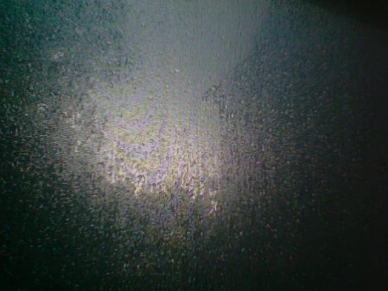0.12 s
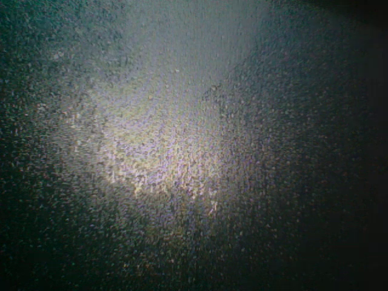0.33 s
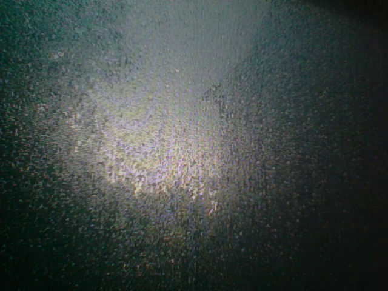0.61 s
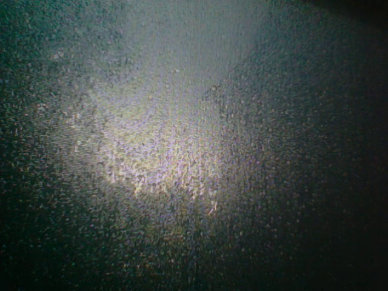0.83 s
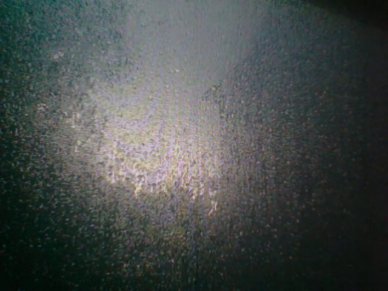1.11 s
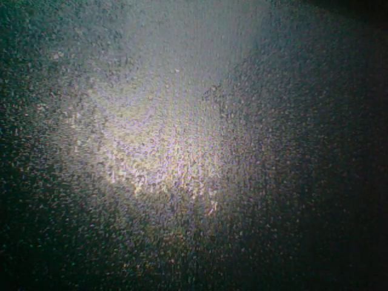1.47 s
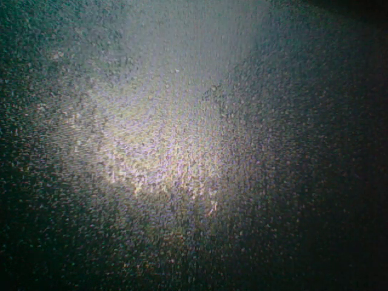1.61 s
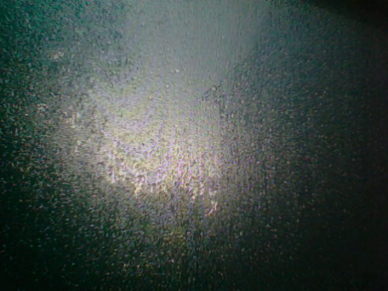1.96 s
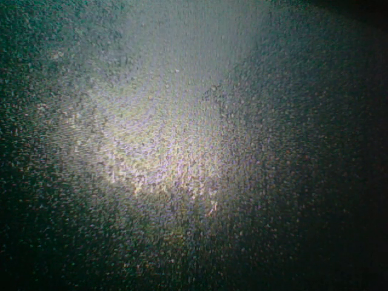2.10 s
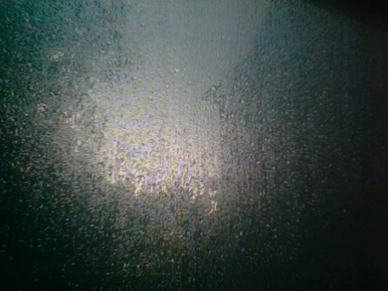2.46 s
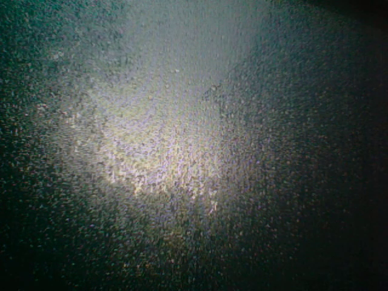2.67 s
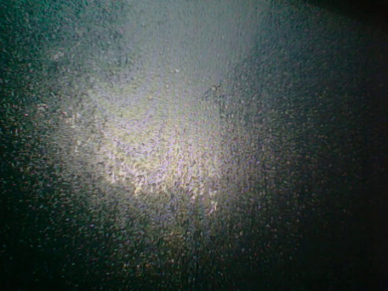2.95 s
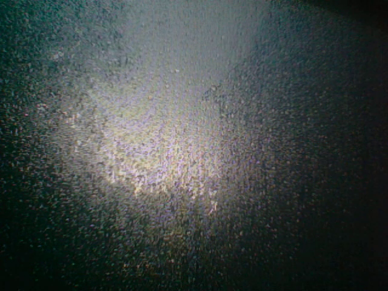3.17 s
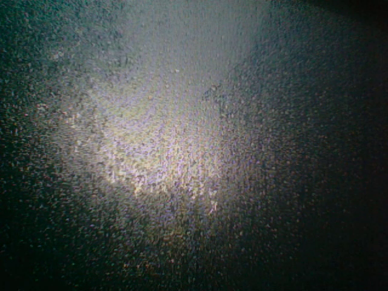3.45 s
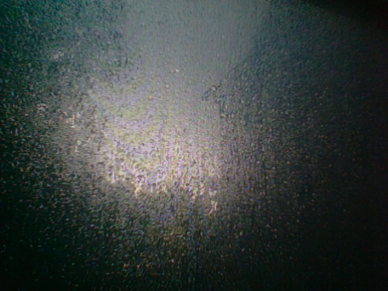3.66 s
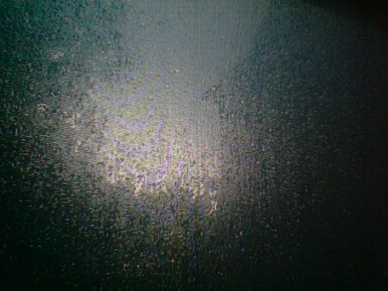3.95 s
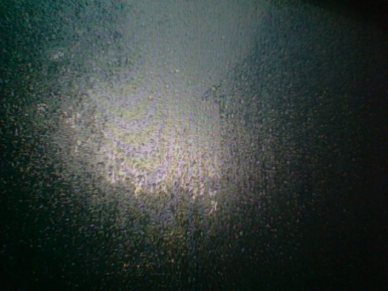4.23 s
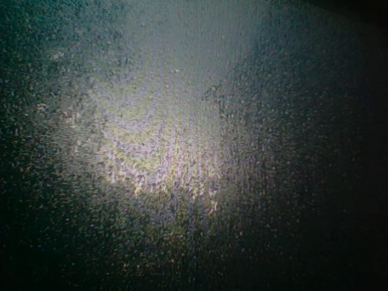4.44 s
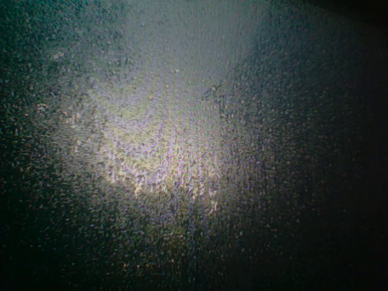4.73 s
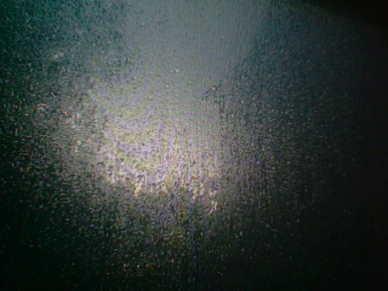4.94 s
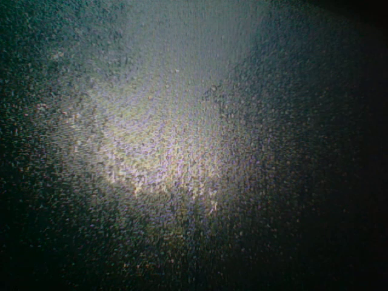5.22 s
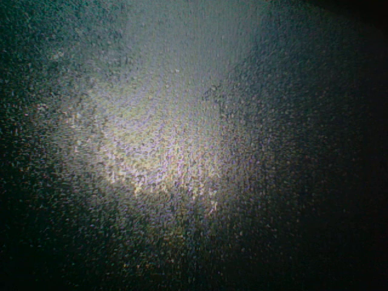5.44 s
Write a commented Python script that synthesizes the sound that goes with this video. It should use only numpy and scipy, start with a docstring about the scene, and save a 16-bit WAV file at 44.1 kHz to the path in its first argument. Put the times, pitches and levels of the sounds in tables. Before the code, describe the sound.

From inside a room at night, a small mono microphone picks up low rain wash and bright individual drops on glass. Something rubs nearby before the first second is over. Distant rumble grows to boxy, clattering thunder in two main waves, the second longer and crackling, all coloured by the ringing pane and room. A quiet motor hum and pulsing fine whine lie underneath.

```python
"""Thunder over night rain

Thunder rolls over steady rain, heard through a window by a small camera. Shock fronts from all along
the lightning channel are random clicks and bursts that ring through the pane and room. Rain is shaped noise,
drops tick on the glass as short rings, and something scuffs nearby as clicks in a hollow body. The camera's
motor hums in sine tones as it slowly speeds up, and its electronics whine in bursts of tones and hiss."""
import sys
import numpy as np
from scipy import signal
from scipy.io import wavfile
from scipy.ndimage import uniform_filter1d

SR = 44100
rng = np.random.default_rng(int(sys.argv[2]) if len(sys.argv) > 2 else 0)


def persist_wave(psi):
    """Save psi, clipped to +-1, as 16-bit WAV."""
    counts = np.round(np.clip(psi, -1, 1) * 32767).astype(np.int16)
    wavfile.write(sys.argv[1], SR, np.atleast_2d(counts).T)


N = 245637  # length in samples

# Tone colour of the rain, used for the wash and the small drops: (pitch_hz, relative_level_db)
RAIN_COLOUR = [(40, -39.5), (70, -35), (92, -16), (110, -9.5), (190, -1), (400, -6.5), (700, -12.5),
               (1300, -13.5), (1700, -17), (2200, -24.5), (2900, -23.5), (5200, -33), (6200, -37),
               (9500, -40), (12500, -46), (15500, -54)]


def amp(db):
    """Turn decibels into an amplitude factor."""
    return 10 ** (np.asarray(db) / 20)


def evened(x):
    """Scale a signal to an average (RMS) strength of 1."""
    return x / np.sqrt(np.mean(x ** 2) + 1e-20)


def read(points, hz):
    """Read a spectrum between its points, on a log-frequency axis."""
    point_hz, value = np.transpose(points)
    return np.interp(np.log(hz + 1), np.log(point_hz + 1), value)


def curve(s, value):
    """Join timed points into a control value for every sample."""
    return np.interp(np.arange(N) / SR, s, value)


def resonate(x, hz, width):
    """Ring at one fixed pitch with gain 1; a narrower width in Hz rings longer."""
    r = np.exp(-np.pi * width / SR)
    feedback = r * np.exp(2j * np.pi * hz / SR)
    return 2 * signal.lfilter([1 - r], [1, -feedback], x + 0j).real


def causal(points, size=16384):
    """Turn a spectrum into a minimum-phase response, whose energy comes as early as it can."""
    hz = abs(np.fft.fftfreq(size, 1 / SR))
    log_gain = np.log(amp(read(points, hz)))
    response = np.fft.ifft(np.exp(np.conj(signal.hilbert(log_gain)))).real
    return response[:size // 2]


def clicks(per_s, spread_db):
    """Random clicks of either sign; a few are much larger."""
    size = amp(spread_db * np.minimum(rng.exponential(1, N), 5))
    sign = rng.choice([-1., 1.], N)
    return size * sign * (rng.random(N) < per_s / SR)


def thunder():
    """All fronts pass the window; distance and direction shift the balance of its parts."""
    # The roll under the strong fronts: (start_s, level_db, bass_against_level_db, treble_against_level_db)
    roll_course = [(0, -73, 0, 10), (.3, -40.5, -7.5, -8), (.65, -45, -9, -11), (.95, -48.5, -5, -13),
                   (1.25, -37.5, -11, -2.5), (1.66, -38.5, -6, 1), (1.7, -31, -12, -6),
                   (1.76, -28.5, -6.5, 2.5), (2.05, -23, -7, -1), (2.402, -29.5, -7, 2),
                   (2.47, -17.5, 2.5, 0.5), (2.66, -23, -9.5, -0.5), (2.951, -25.5, -6, 0.5),
                   (3.15, -29.5, -12, -0.5), (3.42, -31.5, -11.5, 1), (3.499, -25, -7, -1),
                   (3.74, -23.5, -4, -4.5), (3.861, -18.5, -7.5, -5), (4.12, -18, -16.5, -6),
                   (4.34, -25.5, -13, -2.5), (4.65, -21, -12.5, -4), (4.9, -28.5, -8, 1),
                   (5.15, -28.5, -9, -1), (5.42, -36, -13, 1.5), (5.57, -29.5, -20, -7.5)]
    s, *columns = np.transpose(roll_course)
    level_db, bass_db, treble_db = (curve(s, db) for db in columns)

    # the two upper parts follow the treble; growl and crackle do so by their own shares
    upper = amp(-9.5 + treble_db)
    growl = amp(-16.5 + 1.36 * treble_db)
    # these two gain level (dB per second) as the roll moves across the sky
    moved_s = (np.arange(N) - N / 2) / SR
    middle = amp(-10.5 + 1.4 * moved_s)
    crackle = amp(-26 + 0.46 * treble_db + 1.3 * moved_s)

    dense = roll(clump_db=1.0) * amp(level_db)
    body, edge = claps()
    scattered = roll(clump_db=1.05) * amp(level_db)  # short waves come by many more paths
    # sharp fronts set the pane ringing
    rattle = amp(-6.5) * edge + amp(7.5) * resonate(edge, 1460, 74)

    # what drives each part of the window, from deep to bright
    drives = (dense * amp(bass_db) + amp(-12) * body,
              dense + amp(16.5) * body,
              -middle * (dense + amp(18.5) * body),
              upper * (scattered + amp(12.5) * body),
              growl * scattered + amp(0.5) * edge,
              crackle * scattered + rattle)
    return signal.oaconvolve(np.array(drives), window(), axes=1)[:, :N].sum(0)


def roll(clump_db):
    """Dense fronts arrive in clumps as bends of the channel come into earshot."""
    clumps = uniform_filter1d(uniform_filter1d(rng.standard_normal(N), 500), 500)
    fronts = clicks(per_s=900, spread_db=0.79)
    return evened(fronts * amp(clump_db * evened(clumps)))


def claps():
    """Each strong front brings its own quickly dying swarm of reflections; rows: body, bright edge."""
    # Strong fronts before the window's balance: (start_s, level_db, bright_edge_against_level_db, rise_s)
    strong_fronts = [(1.881, -12, -29, 0.0024), (1.919, -13, -22, 0.0026), (2.049, -12.5, -21, 0.0032),
                     (2.281, -15.5, -22, 0.0033), (2.469, -6, -19, 0.0044), (2.552, 0.5, -17, 0.0055),
                     (2.624, -13, -27, 0.012), (2.749, -8.5, -25, 0.0033), (2.777, -12.5, -15, 0.0029),
                     (2.907, -23, -10, .003), (2.959, -10, -35, 0.0035), (3.456, -8, -24, 0.0071),
                     (3.483, -2, -7.5, 0.0051), (3.596, -9, -33, .004), (3.671, -6.5, -29, 0.0036),
                     (3.757, -11, -18, .004), (3.828, -2, -25, 0.0054), (3.896, -12, -29, 0.0016),
                     (3.974, -13, -31, .004), (4.06, -2.5, -35.5, 0.0028), (4.118, -0.5, -29, 0.0031),
                     (4.237, -7.5, -30, 0.0014), (4.277, -9, -24, 0.0049), (4.378, -8, -6, 0.0062),
                     (4.49, -1, -11.5, 0.0044), (4.561, -20, -28, 0.0026), (4.648, -0.5, -8, 0.0026),
                     (4.717, -6.5, -9, 0.0022), (4.804, -16.5, -23, .003), (4.824, -3.5, -6.5, 0.00066),
                     (4.877, -13.5, -11, 0.0014), (5.017, -3, -10, 0.0035), (5.09, -15, -30, 0.0097),
                     (5.137, -12, -17, .004), (5.162, -13, -26, 0.0028), (5.474, -11.5, -30, 0.017)]
    length = 6000  # samples
    decay_s, edge_decay_s = 0.12, 0.073  # time to fall 60 dB; the edge has both fades
    push_db, push_limit_s = 1, .004  # push against the swarm; a slower rise loses its first push
    out, t = np.zeros((2, N + length)), np.arange(length) / SR
    for s, level_db, bright_db, rise in strong_fronts:
        swarm = rng.standard_normal(length) * (rng.random(length) < .1)
        swarm *= amp(-60 * t / decay_s) * (1 - np.exp(-t / rise))
        swarm /= np.linalg.norm(swarm)
        swarm[0] = -amp(push_db) * np.exp(-(rise / push_limit_s) ** 2)
        # the steepest part comes just after the first push
        edge = np.roll(swarm * amp(bright_db - 60 * t / edge_decay_s), 150)
        out[:, round(s * SR):][:, :length] += amp(level_db) * np.array([swarm, edge])
    return out[:, :N]


def window():
    """How pane and room ring after one front: six parts from deep to bright, each of energy 1."""
    # Tone colour of thunder through window and room: (pitch_hz, relative_level_db)
    pane_colour = [(15, -73), (25, -17.5), (59, -20.5), (92, -15.5), (189, 1.5), (294, -14.5), (336, -15),
                   (369, -11), (473, -12), (511, -16.5), (584, -12.5), (763, -32.5), (1430, -33),
                   (1800, -44.5), (2400, -56.5), (3120, -83), (5280, -120)]
    # Room resonances added to it: (pitch_hz, width_hz, level_db)
    room_resonances = [(89.5, 8, 3), (128, 3.4, -15), (141.7, 10, 1), (189.4, 14, -3), (242, 99, 7),
                       (329.7, 7.8, 2.5)]
    x = causal(pane_colour)
    x = x + sum(amp(db) * resonate(x, hz, width) for hz, width, db in room_resonances)
    bands_hz = ((20, 130), (130, 280), (280, 420), (420, 750), (750, 1150), (1150, 2600))
    filters = [signal.butter(3, band, "band", fs=SR, output="sos") for band in bands_hz]
    parts = np.array([signal.sosfilt(sos, x) for sos in filters])
    parts *= np.hanning(2 * len(x))[len(x):]  # smooth fade to silence
    return parts / np.linalg.norm(parts, axis=1)[:, None]


def rain():
    """Wash of far drops: random short-time spectra with drifting patches and shared flicker."""
    rain_db = -47
    frames, hz = N // 128 + 5, np.fft.rfftfreq(512, 1 / SR)
    a, b, patches = rng.standard_normal((frames, 257, 3)).T
    # smooth the patches over pitch, then over time
    patches = evened(uniform_filter1d(uniform_filter1d(patches, 8, 0), 16, 1))
    flicker = evened(uniform_filter1d(rng.standard_normal(frames), 6))
    gain_db = read(RAIN_COLOUR, hz)[:, None] + 0.66 * patches + 0.19 * flicker
    spectra = (a + 1j * b) * amp(gain_db)
    wash = signal.istft(spectra, nperseg=512, noverlap=384)[1][:N]
    return amp(rain_db) * evened(wash)


def drops():
    """Loud drops tick on the glass at set moments, over a random patter of small ones."""
    # The loudest drops, all lowered by 1 dB below: (start_s, level_db, pitch_hz)
    loud_drops = [(0.6459, -51, 3910), (1, -44, 4030), (1.0091, -55, 8250), (1.074, -49, 9700),
                  (1.5404, -54, 3850), (1.6008, -56, 9000), (1.9799, -49, 3700), (2.164, -46, 3920),
                  (2.2204, -50, 4150), (2.5222, -48.5, 4070), (2.9068, -56, 9560), (2.9522, -61, 10000),
                  (3.014, -48, 3990), (3.3094, -60, 9630), (3.3802, -48, 3750), (3.4401, -53, 4160),
                  (3.5019, -60, 9660), (3.881, -47, 3620), (4.1121, -52.5, 8480), (4.1619, -50, 3860),
                  (4.238, -47, 3890), (4.401, -46, 4230), (4.554, -57, 3930), (4.655, -56, 9910),
                  (4.7523, -46, 3500), (4.838, -58, 8000), (5.004, -57, 11200), (5.5103, -55, 4100)]
    patter_db, patter_per_s = -70.5, 100
    pitches = np.geomspace(2800, 12500, 16)
    patter = 0
    for hz in pitches:
        gain = amp(read(RAIN_COLOUR, hz) + 2.9 * np.log2(hz))  # tilted up by 2.9 dB per octave
        hits = clicks(patter_per_s / len(pitches), 1.0)
        patter = patter + gain * signal.oaconvolve(hits, tick(hz, 6.4, 0.0043))[:N]
    out = amp(patter_db) * evened(patter)
    for s, level_db, hz in loud_drops:
        part = out[round(s * SR):][:1000]
        part += amp(level_db - 1.0) * tick(hz, 2.1, 0.012)[:len(part)]
    return out


def tick(hz, splash, t60):
    """One drop: a brief noisy splash around its pitch and a ring that falls 60 dB in t60 seconds."""
    t = np.arange(1000) / SR
    burst = resonate(rng.standard_normal(1000), hz, 1500) * amp(-60 * t / 0.022)
    ring = amp(-60 * t / t60) * np.sin(2 * np.pi * hz * t)
    soft_start = 1 - np.exp(-t / 0.0004)
    return (ring + splash * resonate(burst, hz, 2200)) * soft_start


def scuff():
    """A touch and a short rub: uneven slips into a hollow body; each rises, holds and fades."""
    # Resonances of the hollow body: (pitch_hz, width_hz, relative_level_db)
    hollow_body = [(780, 160, 5.5), (960, 330, 5.5), (1600, 180, -11), (2000, 190, -11),
                   (4160, 1700, -18.5)]
    # The touch and the rub: (start_s, hold_s, level_db)
    strokes = [(0.74, .012, -51), (0.828, 0.1, -37.5)]
    rise_db_per_s, sag_db_per_s, fall_db_per_s = 400, 70, 600  # before, during and after the hold
    slips, t = clicks(1500, 1.1), np.arange(N) / SR
    body = 0
    for hz, width, db in hollow_body:
        ringing = resonate(resonate(slips, hz, width), hz, width)
        body = body + amp(db) * ringing / np.sqrt(width)
    stroke = 0
    for s, hold, db in strokes:
        rise = rise_db_per_s * np.maximum(s - t, 0)
        sag = sag_db_per_s * np.clip(t - s, 0, hold)
        fall = fall_db_per_s * np.maximum(t - s - hold, 0)
        stroke = stroke + amp(db - rise - fall - sag)
    return stroke * evened(body)


def motor():
    """A turning shaft hums at multiples of its slowly rising speed, each wavering a little."""
    # Which multiples of the shaft speed sound: (multiple)
    multiples = (5, 7, 8, 9, 11, 12, 13, 20, 24, 26, 28, 32)
    # How loud each of them is on average: (level_db)
    hum_levels = (-54, -58.5, -76, -59, -84, -59.5, -57.5, -68.5, -79.5, -73.5, -72.5, -79)
    speed_hz, rise_hz_per_s, bend_hz_per_s2 = 101.27, .45, -.019  # rising ever more slowly
    t = np.arange(N) / SR
    turns = np.cumsum(speed_hz + rise_hz_per_s * t + bend_hz_per_s2 * t ** 2) / SR
    hum = 0
    for k, db in zip(multiples, hum_levels):
        waver = evened(uniform_filter1d(uniform_filter1d(rng.standard_normal(N), 4000), 4000))
        tone = np.sin(2 * np.pi * (k * turns + rng.random()))
        hum = hum + np.sqrt(2) * amp(db + 0.9 * waver) * tone
    return hum


def whine():
    """Thin tones and a faint fizz switch on for part of every sensor readout, each time a little different."""
    # Pitches of the thin tones: (pitch_hz)
    tone_pitches = (8000, 10605, 11049, 12951, 15249)
    # Their levels before the switching: (level_db)
    tone_levels = (-78.5, -93.5, -86, -90, -86)
    # Tone colour of the hiss that comes with the whine: (pitch_hz, relative_level_db)
    fizz_colour = [(4000, -30.5), (7000, -0.5), (9500, -1), (12000, -6.5), (15500, -18)]
    readouts_per_s, on_share, fizz_db = 14.985, .43, -78.5  # fizz level before the switching
    t = np.arange(N) / SR
    readouts = t * readouts_per_s + .45
    load = amp(1.5 * rng.standard_normal(100))[readouts.astype(int)]
    busy = uniform_filter1d(load * (readouts % 1 < on_share), 300)  # softened switching
    hiss = signal.oaconvolve(rng.standard_normal(N), causal(fizz_colour))[:N]
    fizz = amp(fizz_db) * evened(hiss)
    tones = sum(np.sqrt(2) * amp(db) * np.sin(2 * np.pi * hz * t)
                for hz, db in zip(tone_pitches, tone_levels))
    return busy * (fizz + tones)


def scene():
    """Add all sources into one channel."""
    return (thunder() + rain() + drops() + scuff() + motor() + whine())[None]


def record(dry):
    """The small microphone drops the lowest bass; then a steep filter cuts the highest treble."""
    bass_limit_hz, treble_limit_hz = 44, 15640
    heard = signal.sosfilt(signal.butter(2, bass_limit_hz, "high", fs=SR, output="sos"), dry)
    # mirrored ends keep the length the same after the filter
    heard = np.pad(heard, ((0, 0), (255, 255)), "reflect", reflect_type="odd")
    treble_cut = signal.firwin(511, treble_limit_hz, window=("kaiser", 9), fs=SR)
    return signal.oaconvolve(heard, treble_cut[None], "valid")


dry = scene()
out = record(dry)
persist_wave(out)
```